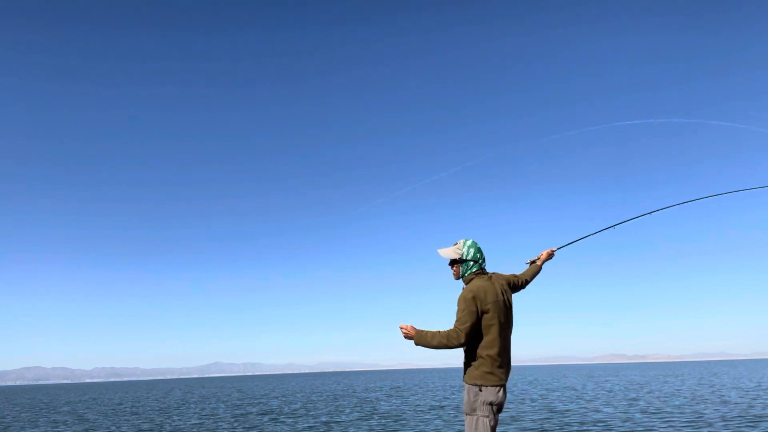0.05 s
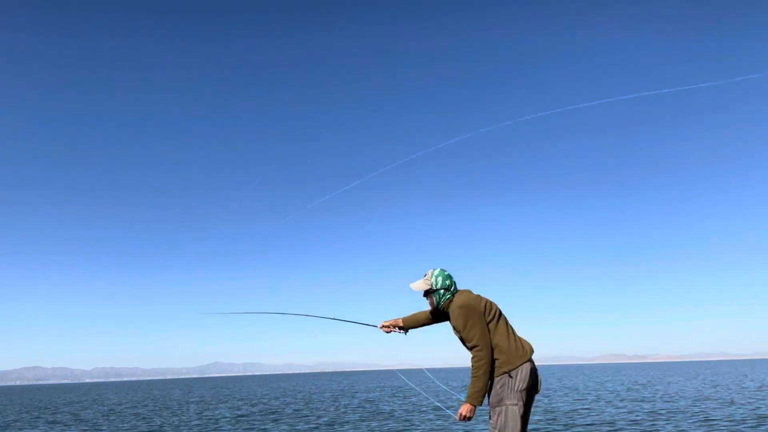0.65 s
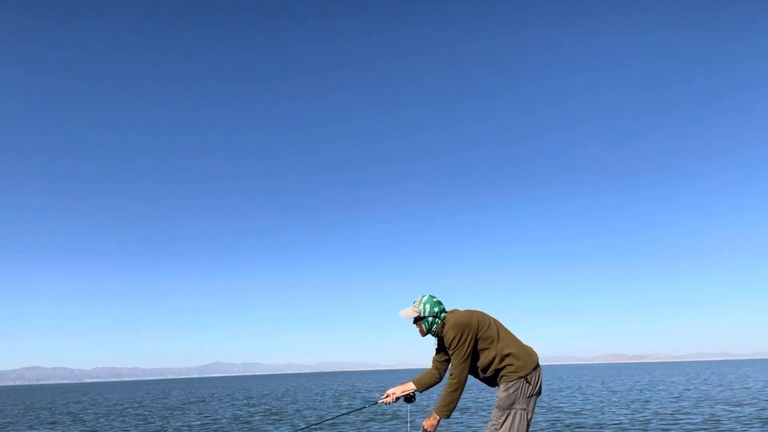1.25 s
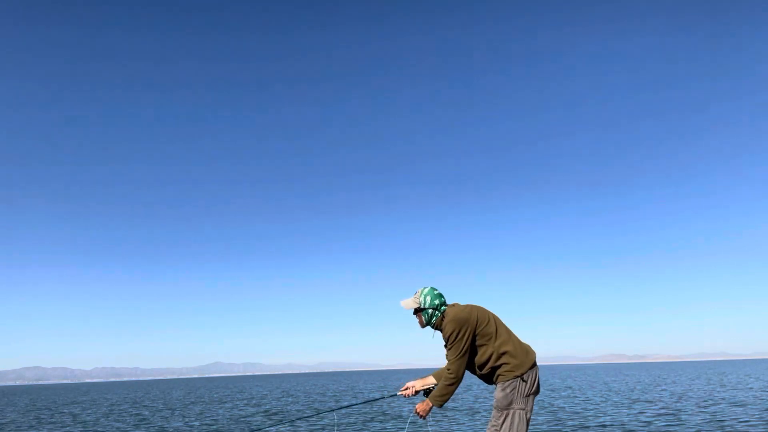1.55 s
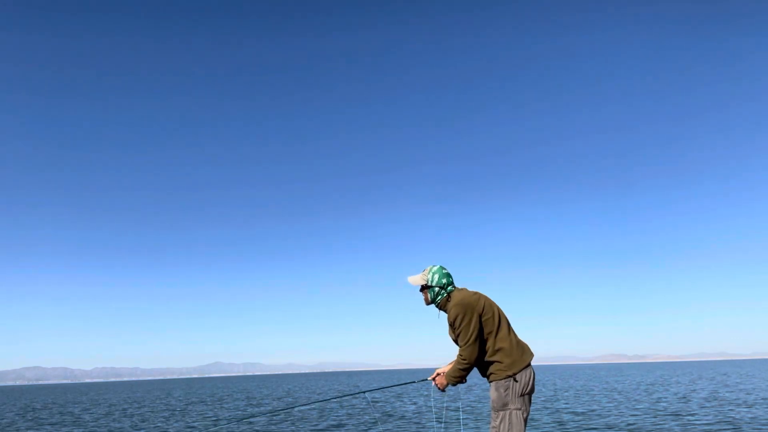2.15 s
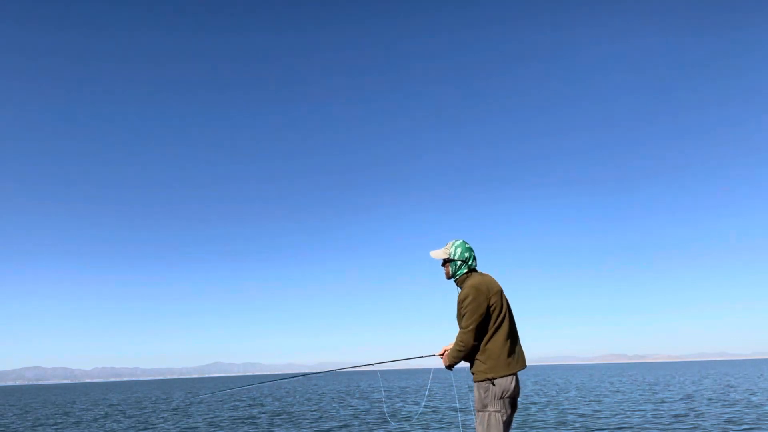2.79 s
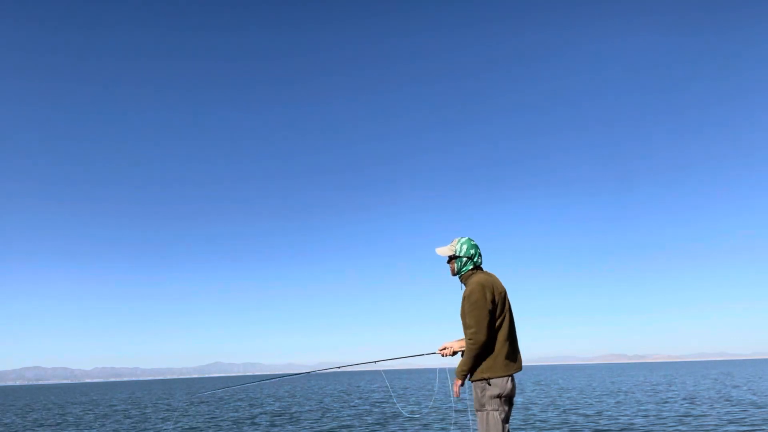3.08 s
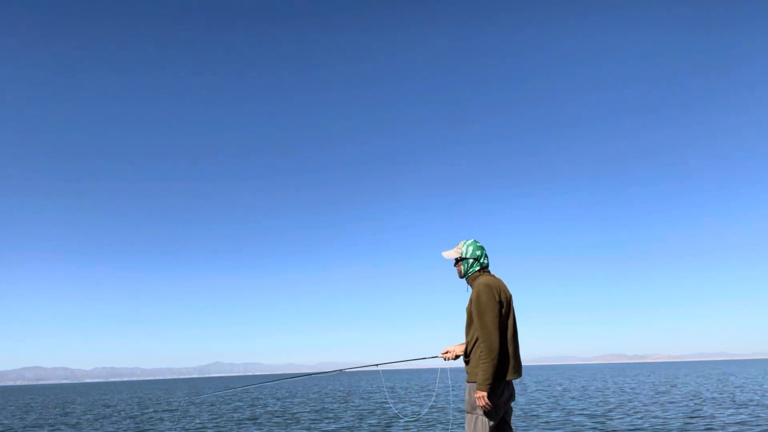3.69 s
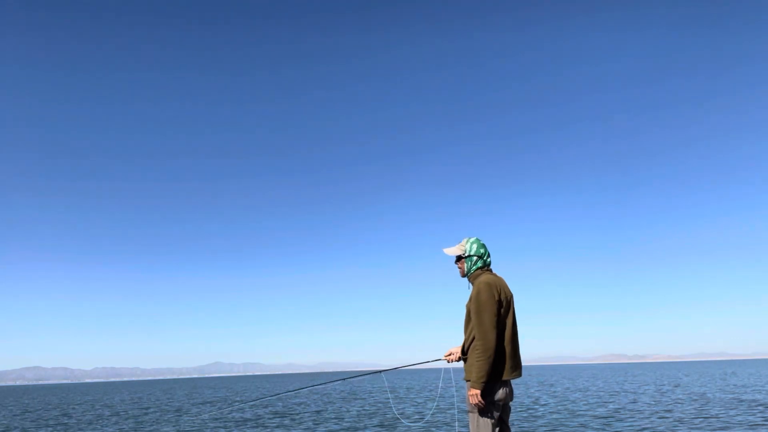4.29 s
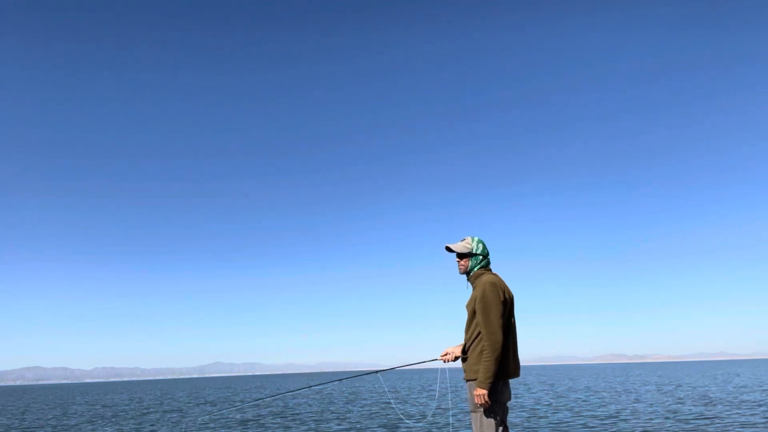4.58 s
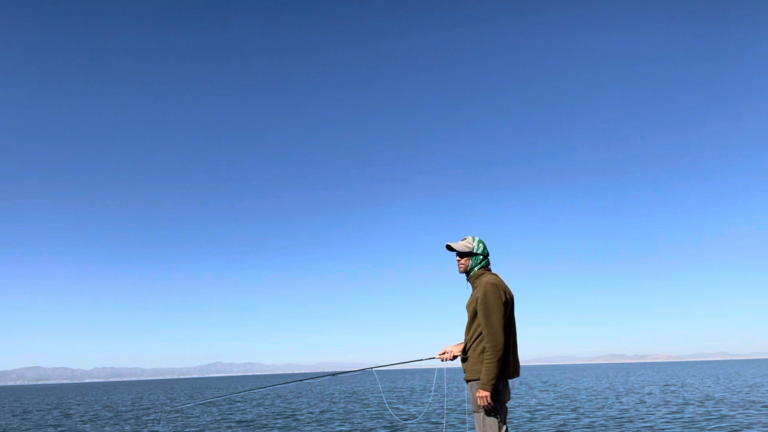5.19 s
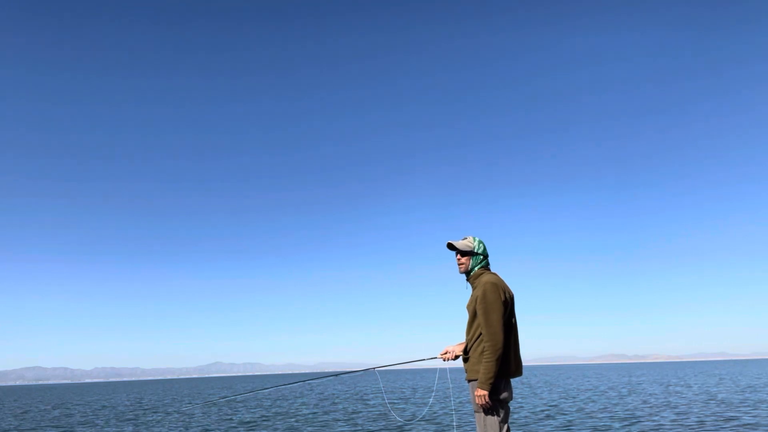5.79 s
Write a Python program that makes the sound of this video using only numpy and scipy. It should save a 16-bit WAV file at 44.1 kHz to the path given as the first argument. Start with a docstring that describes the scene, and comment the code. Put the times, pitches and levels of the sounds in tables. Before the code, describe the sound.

A low, steady rumble of distant traffic fills the air beside a lake, with two engines droning off to the right in stereo. Near the start, a fly cast makes one soft, rising whoosh as the line hisses out, followed by a quick cluster of small clicks of line on rod. After that the engines carry on, one swelling and dropping slightly in pitch as it passes.

```python
"""Fly cast on a lake shore

An angler casts: rod and line swish as they cut the air, and the line whistles, hisses out through
the guides, then ticks on them and taps the rod. Off to the right, two distant engines hum over
rumble and tyre noise, their pitch sinking slowly as they pass.
Two microphone ports a hand's width apart pick it up."""
import sys
import numpy as np
from scipy import signal
from scipy.fft import rfft, irfft, next_fast_len
from scipy.io import wavfile
from scipy.ndimage import uniform_filter1d, map_coordinates

SR = 44100
rng = np.random.default_rng(int(sys.argv[2]) if len(sys.argv) > 2 else 0)


def wav_out(sig):
    """Save sig, one row per channel (or a flat mono array), as 16-bit PCM at SR to the path in sys.argv[1]."""
    wavfile.write(sys.argv[1], SR, np.round(np.clip(np.atleast_2d(sig).T, -1, 1) * 32767).astype(np.int16))


N = 261954

# rod and line cutting the air, from back cast to forward stroke to the loop rolling out:
# peak_s, level_db, rise_db_per_s, fall_db_per_s, pitch_hz, glide_octaves_per_s, width_hz
SWISHES = [ (0.065, -58, 92, 300, 12400, 3, 5040), (.07, -63.5, 200, 220, 5000, -0.5, 2800),
           (.24, -66, 400, 604, 5240, -6, 2200), (.32, -76.5, 78, 48.5, 3700, 0, 1820),
           (.535, -53.5, 350, 330, 560, 8, 150), (0.593, -47, 153, 320, 1060, 11, 517),
           (.6, -62.5, 300, 200, 2487, 2.5, 1400), (0.598, -65, 152, 145, 4840, 1.5, 1770),
           (0.642, -60.5, 160, 260, 3490, 1, 860), (.675, -62, 97, 85, 1899, -0.5, 1340),
           (.715, -65.5, 111, 106, 11130, 0, 3200), (.81, -64.5, 220, 220, 2050, -1, 220),
           (.86, -70, 67, 170, 3690, 0.5, 1800)]
# short zips of the taut line: peak_s, level_db, slope_db_per_s, pitch_hz
WHISTLES = [(.585, -63, 350, 3000), (.592, -60, 300, 4450), (.632, -65, 350, 6300), (.652, -63, 300, 3700),
            (.655, -66, 250, 4700), (.678, -61, 400, 2000), (.73, -66, 170, 4520), (.735, -69, 280, 6350),
            (.84, -66.5, 130, 4580)]
# line hauled, shot and gathered through the guides:
# full_speed_s, level_db, hold_s, release_db_per_s, roughness_db
SLIDES = [ (0, -55.5, 0.038, 187, 0.5), (0.146, -69, 0.015, 82, 1.5), (0.235, -76, 0.01, 300, 2),
          (0.295, -83.5, 0.027, 93, 2.5), (0.508, -74.5, .02, 100, 3), (0.557, -63, 0.045, 100, 2),
          (0.69, -65.5, .024, 60.5, 0), (0.85, -75, 0.02, 75.5, 2.5), (1.287, -77.5, .1, 219, 3)]
# colour of the sliding line: frequency_hz, gain_db
SLIDE_EQ = [(900, -20), (2200, -2), (3400, -3), (4700, 1), (6200, -1), (7600, -7), (9800, 0), (11500, 1),
            (13000, -1), (14300, -6), (15300, -15)]
# sleeve and slack line rustling: peak_s, level_db, rise_db_per_s, fall_db_per_s
RUSTLES = [(1.04, -78.5, 200, 130), (1.3, -75, 130, 75)]
# slack line ticking on the guides: start_s, level_db, pitch_hz
GUIDE_TICKS = [(1.0188, -48.5, 6000), (1.042, -54, 7500), (1.1044, -56, 13000), (1.2226, -54.5, 8500),
               (1.2474, -53, 10000), (1.257, -45.5, 9500), (1.2725, -49.5, 10500), (1.293, -50, 10000),
               (1.3135, -47, 11000), (1.3365, -56, 10000), (1.3664, -56, 9500), (1.4014, -57.5, 10300),
               (1.8796, -54.5, 11800), (5.6, -57.5, 10500), (5.8644, -55, 6000)]
# line tapping the rod: start_s, level_db, ring_hz, t60_s
ROD_TAPS = [(1.118, -46, 3950, .012), (1.299, -40.5, 3750, .008), (1.3135, -34, 4450, 0.01),
            (1.346, -38.5, 1700, 0.025), (1.38, -50.5, 3400, 0.025), (1.413, -47.5, 3810, .009)]
# colour of a contact's snap: frequency_hz, gain_db
SNAP_EQ = [(1000, -18), (3000, -3), (4500, 0), (7000, -2), (11000, -3), (13500, -9), (15300, -22)]

# fader ride on the passing engine's firing note: time_s, level_db
FIRING_FADER = [(0, -55), (1.2, -54.5), (2.1, -41.5), (2.7, -36.5), (3.3, -39), (3.9, -35), (4.7, -33.5),
                (5.05, -51.5), (5.6, -35.5), (5.94, -39.5)]
# its overtones: firing_multiple, peak_s, level_db, rise_db_per_s, fall_db_per_s
PASSING_ORDERS = [(3, 1.3, -54, 25, 33), (3, 2.75, -43.7, 9, 3.2), (4, 1.15, -59, 10, 25),
                  (4, 2.85, -49.7, 11, 5), (5, 4.4, -57, 4, 5.5)]
# pitch of each of its gear whines: firing_multiple
WHINE_RATIOS = (4.82, 5.88)
# swell of each whine: peak_s, level_db, rise_db_per_s, fall_db_per_s
WHINE_SWELLS = [(3, -54.5, 11, 7), (5.3, -49, 20, 19)]
# the heavy engine's drone: cycle_multiple, peak_s, level_db, rise_db_per_s, fall_db_per_s
HEAVY_ORDERS = [(3, .3, -43, 5, 1), (3, 3.87, -37.5, 24, 22.5), (5, 0.75, -35, 4, 10),
                (5, 4.7, -42.5, 3, 9), (7, 2.6, -43, 12.5, 10), (8, 1.3, -37.7, 2.2, 2.2)]
# a far hum: pitch_multiple, peak_s, level_db, rise_db_per_s, fall_db_per_s
FAR_ORDERS = [(2, 2.3, -57, 6, 4.4), (3, 2.8, -53, 6.5, 6)]

# fader rides on the traffic's rumble, its sub, the tyres and their treble: time_s, level_db
RUMBLE_FADER = [(0, -35), (.7, -36), (1.25, -33), (1.8, -36), (2.6, -34.5), (3.3, -33), (4, -34), (5, -36),
                (5.94, -34)]
SUB_FADER = [(0, -38.5), (1.3, -38.5), (3.3, -41), (3.85, -33.5), (4.3, -47.5), (4.9, -41.5), (5.6, -42),
             (5.94, -44.5)]
TYRE_FADER = [(0, -58), (1.8, -58.5), (3.3, -58.5), (4.2, -56.5), (4.8, -58.5), (5.5, -57)]
SIZZLE_FADER = [(0, -73.5), (1.6, -76), (3, -73.5), (4.1, -69.5), (5, -71), (5.94, -67.5)]
# two swells of road roar: peak_s, level_db, rise_db_per_s, fall_db_per_s
ROAR_SWELLS = [(1.301, -57.5, 6.5, 30.5), (3, -46.5, 4.5, 0.13)]
# colours of those five layers and of the faint hiss behind them: frequency_hz, gain_db
RUMBLE_EQ = [(10, -33), (20, -22), (30, -13), (42, -4), (55, 2), (85, -1), (125, -2), (160, -5),
             (210, -17.5), (400, -32), (1000, -100)]
SUB_EQ = [(20, -26), (36, 5.5), (47, 15.5), (66, 11), (90, -4.5), (200, -69)]
TYRE_EQ = [(200, -28), (500, -16.5), (680, 1.5), (760, 0), (960, 1.5), (1110, -3), (1400, -9),
           (2200, -11.5), (2900, -26.5), (4500, -38.5), (8000, -82.5)]
SIZZLE_EQ = [(1500, -18.5), (2400, 8), (3000, 2.5), (3900, -1.5), (4700, 0.5), (6000, -8), (7400, -25.5),
             (10000, -66)]
ROAR_EQ = [(100, -23), (200, 4.5), (280, 0), (390, 0), (430, -3.5), (480, -2.5), (570, -8), (650, -11.5),
           (1000, -27), (3000, -94)]
AIR_EQ = [(3000, -20), (7500, -5), (10000, 0), (12200, 0), (13700, -6), (14600, -20)]

# stereo width: frequency_hz, side_minus_mid_db
STEREO_WIDTH = [(35, -15.5), (60, -14.5), (110, -9.5), (200, -7), (380, -2), (700, 3), (1290, 7),
                (2380, -1.5), (4400, 1), (8120, 5.5), (11000, -9), (15000, -16)]
# colour difference between the ports: frequency_hz, left_minus_right_db
PORT_TILT = [(40, 1.7), (70, 0.5), (110, 0), (200, 0), (380, -3), (700, -2.5), (1290, 0), (2380, 3),
             (4400, 1), (8120, -0.5), (15000, 0.5)]

PORT_LAG_S = .00043  # sound from the right reaches the left port this late
CONTACT_SAMPLES = SR // 10


def cast():
    """The moving rod and line: fluttering swishes and whistles over rasp and rustle."""
    airy = swishes() + whistles()
    flutter = amp(1.2 * wobble(70))
    return ports(airy * flutter + guide_rasp() + rustle(), direct=.3)


def swishes():
    """Rod and line shed eddies at a pitch that climbs with their speed."""
    return sum(swell(s, db, rise, fall) * eddies(glide(s, hz, octaves_per_s), width_hz)
               for s, db, rise, fall, hz, octaves_per_s, width_hz in SWISHES)


def whistles():
    """The taut line sings in narrow, rising zips."""
    return sum(swell(s, db, slope, slope) * eddies(glide(s, hz, octaves_per_s=.8), width_hz=240)
               for s, db, slope, hz in WHISTLES)


def guide_rasp():
    """Line slides through the guides with a hiss, roughened by tiny catches."""
    attack_db_per_s = 205
    sliding = sum(swell(s, db, attack_db_per_s, release, hold) * catches(rough_db)
                  for s, db, hold, release, rough_db in SLIDES)
    flicker = amp(1.2 * wobble(60))
    return sliding * flicker * rush(SLIDE_EQ, patchy_db=1.8)


def rustle():
    """Sleeve and slack line give a grainy brush as the line is gathered."""
    envelope = sum(swell(*row) for row in RUSTLES)
    return envelope * catches(rough_db=5) * eddies(np.full(N, 4450), width_hz=1400)


def catches(rough_db, per_s=380):
    """The grain of friction: a fast, jittery gain of rms 1."""
    return unit(amp(rough_db * np.minimum(wobble(per_s), 2)))


def slack_line():
    """On a guide the line makes a short snap; on the rod it adds a rough, damped ring."""
    t = np.arange(CONTACT_SAMPLES) / SR
    track = np.zeros((2, N + SR))
    bright = rush(SNAP_EQ, patchy_db=2)
    for s, db, hz in GUIDE_TICKS:
        track[:, round(s * SR):][:, :len(t)] += amp(db) * snap(bright, hz)
    for s, db, hz, t60_s in ROD_TAPS:
        drift = np.cumsum(rng.standard_normal((2, len(t))), axis=1)
        scuff = drift * np.sqrt(np.pi * .17 * hz / SR)  # wandering phase roughens the ring
        ring = np.sin(2 * np.pi * hz * t + scuff) * strike(t60_s)
        tap = ring + amp(-15) * snap(bright, hz=5000)
        track[:, round(s * SR):][:, :len(t)] += amp(db) * tap
    return ports(track[:, :N], direct=.34)


def snap(noise, hz, width_octaves=.55):
    """The click of a contact: a sliver of noise, band-passed around hz."""
    start = rng.integers(N - CONTACT_SAMPLES)
    spectrum = rfft(noise[:, start:start + CONTACT_SAMPLES])
    octaves_off = np.log2((np.fft.rfftfreq(CONTACT_SAMPLES, 1 / SR) + 1) / hz)
    burst = irfft(spectrum / (1 + (octaves_off / width_octaves) ** 2), CONTACT_SAMPLES)
    return unit(burst) * strike(t60_s=.0075)


def strike(t60_s):
    """A contact's envelope: quick attack, exponential decay."""
    t = np.arange(CONTACT_SAMPLES) / SR
    attack_s = .11 * t60_s
    return (1 - np.exp(-t / attack_s)) * amp(-60 * t / t60_s)


def engines():
    """Both engines and a far hum of steady pitch, placed right by the lag between the ports."""
    mono = passing_engine() + heavy_engine() + hum(np.full(N, 135.2), FAR_ORDERS)
    return filtered(mono, lambda hz: np.exp(1j * np.pi * hz * PORT_LAG_S * np.array([[-1], [1]])))


def passing_engine(centre_hz=79, doppler_hz=5.3, nearest_s=3.5, pass_s=2.3):
    """Exhaust note and gear whine, sinking fastest where the engine is nearest."""
    firing_hz = centre_hz - doppler_hz * np.tanh((clock() - nearest_s) / pass_s)
    exhaust = fader(FIRING_FADER) * tone(firing_hz) + hum(firing_hz, PASSING_ORDERS)
    whine = sum(swell(*shape) * tone(ratio * firing_hz)
                for ratio, shape in zip(WHINE_RATIOS, WHINE_SWELLS))
    return exhaust + whine


def heavy_engine(start_hz=18.65, idle_hz=17.3, settle_s=1.55):
    """A low exhaust drone whose cycle rate settles towards idle."""
    cycle_hz = idle_hz + (start_hz - idle_hz) * np.exp(-clock() / settle_s)
    return hum(cycle_hz, HEAVY_ORDERS)


def hum(rate_hz, orders):
    """Harmonics of an engine's rate, each swelling and fading on its own."""
    return sum(swell(*shape) * tone(round(multiple) * rate_hz) for multiple, *shape in orders)


def traffic():
    """Exhaust rumble and tyre roar, which brightens as the vehicles come nearer."""
    rumble = fader(RUMBLE_FADER) * rush(RUMBLE_EQ, patchy_db=-.33)
    sub = fader(SUB_FADER) * rush(SUB_EQ, patchy_db=2.8)
    roar = sum(swell(*row) for row in ROAR_SWELLS) * rush(ROAR_EQ, patchy_db=.6)
    tyres = fader(TYRE_FADER) * rush(TYRE_EQ, patchy_db=1.36)
    sizzle = fader(SIZZLE_FADER) * rush(SIZZLE_EQ, patchy_db=1.7)
    return ports(rumble + sub + roar + tyres + sizzle, direct=.49)


def air():
    """A faint, even hiss from all around."""
    return ports(amp(-90) * rush(AIR_EQ, patchy_db=.5), direct=0)


def eddies(hz, width_hz):
    """Two narrow noise bands of rms 1 around a pitch that may move."""
    slow = filtered(rng.standard_normal((2, 2, N)), lambda f: 1 / np.sqrt(1 + (2 * f / width_hz) ** 6))
    phase = phase_of(hz)
    return unit(slow[0] * np.cos(phase) + slow[1] * np.sin(phase))


def tone(hz):
    """A sine of rms near 1 that wavers on its way through moving air."""
    waver = amp(.9 * wobble(4))
    return np.sqrt(2) * waver * np.sin(phase_of(hz) + .1 * wobble(11))


def rush(eq, patchy_db):
    """Two unrelated coloured noises of rms 1 with patches of random gain."""
    spectrogram = signal.stft(rng.standard_normal((2, N)), nperseg=512)[2]
    patches = rng.standard_normal(spectrogram.shape[1:])
    patches = uniform_filter1d(patches, size=5, axis=0)  # smear across frequency
    patches = uniform_filter1d(patches, size=16, axis=1)  # and across time
    pair = signal.istft(spectrogram * amp(patchy_db * unit(patches)), nperseg=512)[1][:, :N]
    return unit(filtered(pair, lambda hz: amp(along(eq, hz))))


def ports(pair, direct):
    """Left and right: the direct share arrives with a lag between the ports, the rest from all around."""
    def side_blend(hz):
        lean = -np.clip(direct, 0, 1) * np.sin(2 * np.pi * hz * PORT_LAG_S)
        return np.array([1j * lean, np.sqrt(1 - lean ** 2)])

    difference = filtered(pair, side_blend).sum(axis=0)
    side = filtered(difference, lambda hz: amp(along(STEREO_WIDTH, hz)))
    return np.array([pair[0] + side, pair[0] - side])


def swell(s, db, rise, fall, hold=0):
    """A gain that climbs to db at time s, holds and falls; slopes in dB per second."""
    t = clock() - s
    return amp(db - abs(rise) * np.maximum(-t, 0) - abs(fall) * np.maximum(t - hold, 0))


def fader(points):
    """A gain that rides through time_s, level_db points."""
    return amp(np.interp(clock(), *np.transpose(points)))


def glide(s, hz, octaves_per_s):
    """A pitch sweep through hz at time s, an octave each way at most."""
    return hz * 2 ** np.clip(octaves_per_s * (clock() - s), -1, 1)


def wobble(knots_per_s):
    """A smooth random curve."""
    knots = rng.standard_normal(int(N * knots_per_s / SR) + 4)
    return map_coordinates(knots, [clock() * knots_per_s])


def filtered(x, response):
    """x through a complex frequency response."""
    size = next_fast_len(N + SR // 2)
    return irfft(rfft(x, size) * response(np.fft.rfftfreq(size, 1 / SR)), size)[..., :N]


def along(eq, hz):
    """An EQ curve's dB at hz, on a log frequency axis."""
    points_hz, points_db = np.transpose(eq)
    return np.interp(np.log(hz + 1), np.log(points_hz + 1), points_db)


def phase_of(hz):
    """Running phase of a moving frequency, from a random start."""
    return 2 * np.pi * (np.cumsum(hz) / SR + rng.random())


def amp(db):
    """Decibels to gain."""
    return 10 ** (np.asarray(db) / 20)


def unit(x):
    """Scaled to rms 1."""
    return x / np.sqrt(np.mean(x ** 2) + 1e-20)


def clock():
    """The time of each sample in seconds."""
    return np.arange(N) / SR


def scene():
    """The cast and its ticks over a bed of engines, road and hiss."""
    return cast() + slack_line() + engines() + traffic() + air()


def record(dry, top_hz=15400):
    """The two ports differ a little in colour; nothing is kept above top_hz."""
    split = np.array([[.5], [-.5]])
    return filtered(dry, lambda hz: amp(along(PORT_TILT, hz) * split) * (hz < top_hz))


dry = scene()
out = record(dry)
wav_out(out)
```